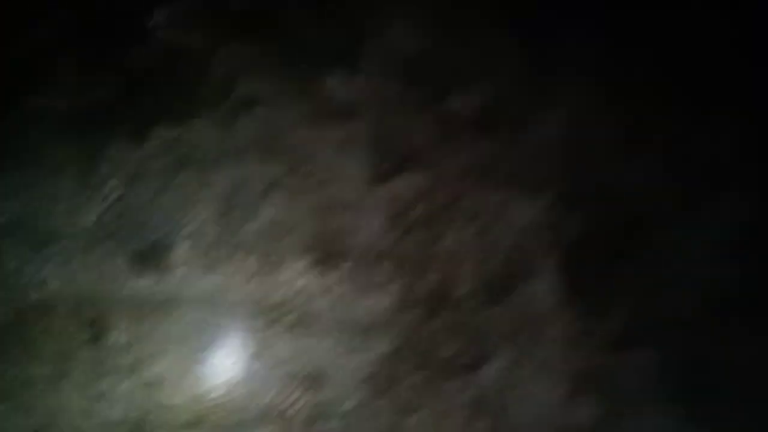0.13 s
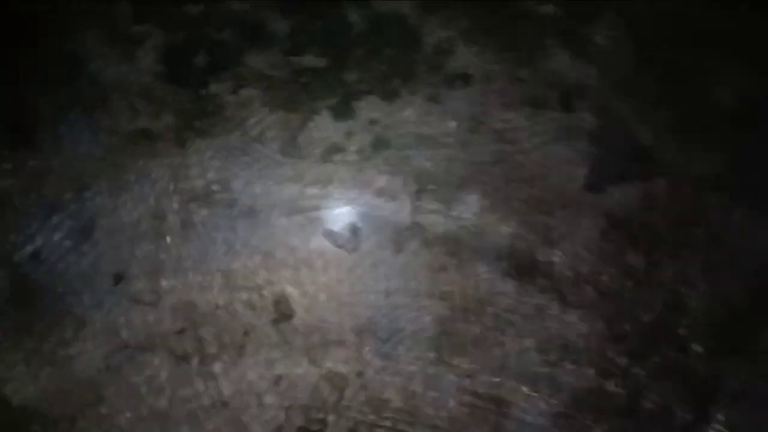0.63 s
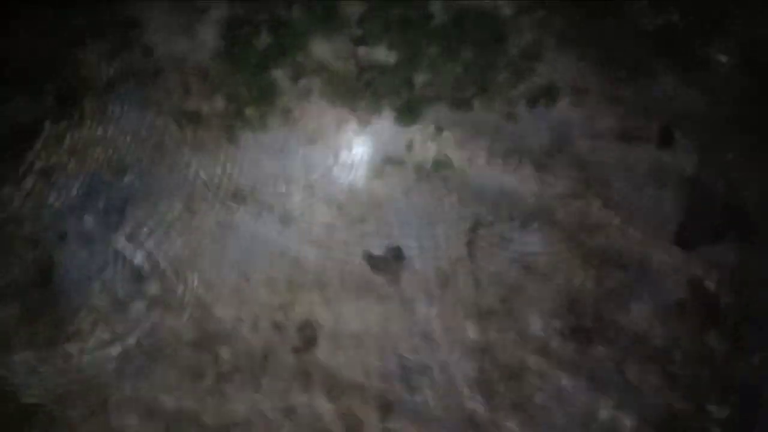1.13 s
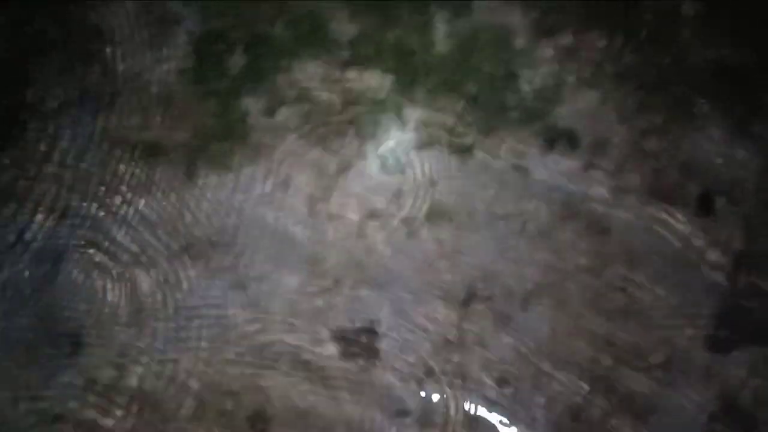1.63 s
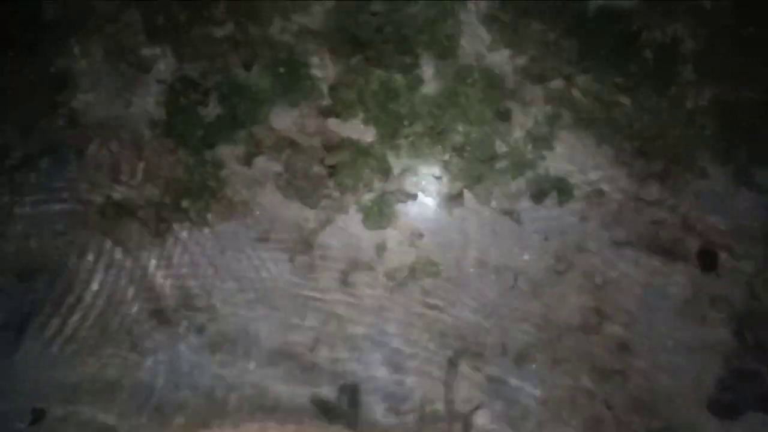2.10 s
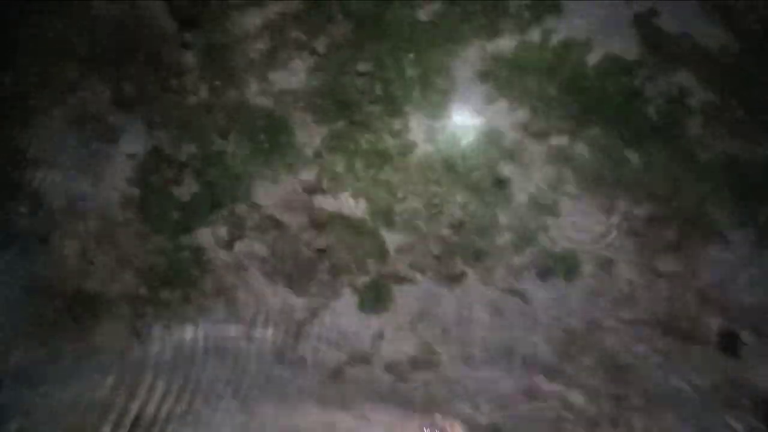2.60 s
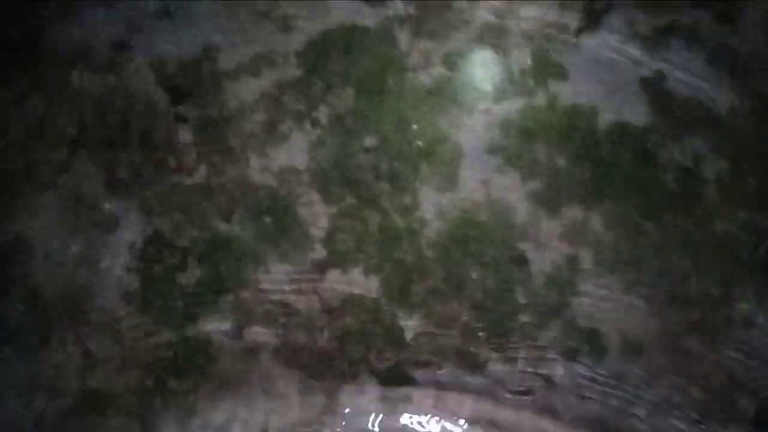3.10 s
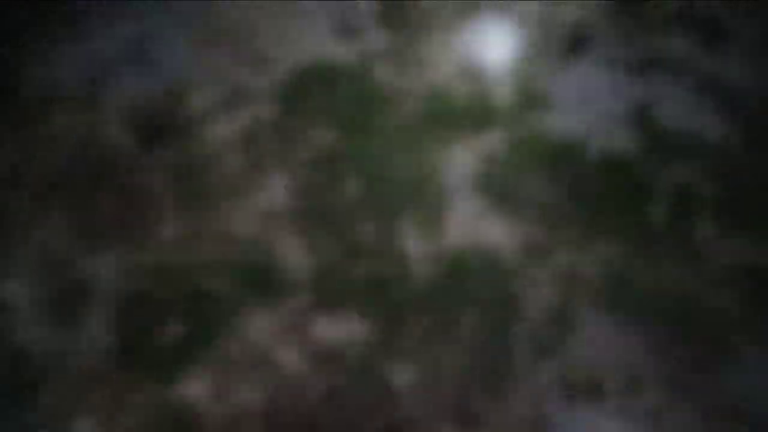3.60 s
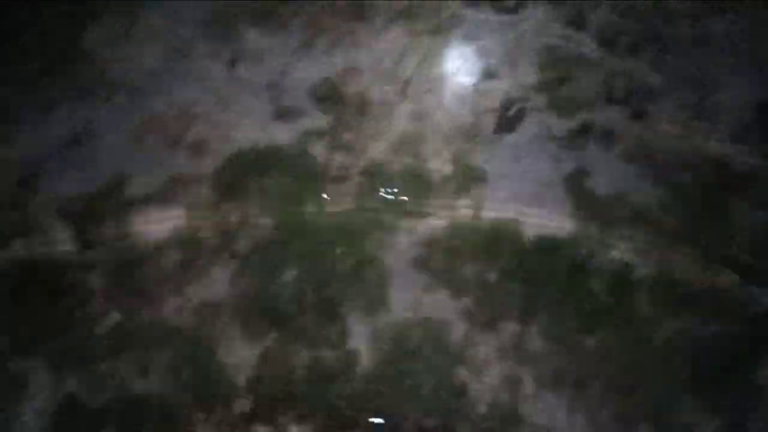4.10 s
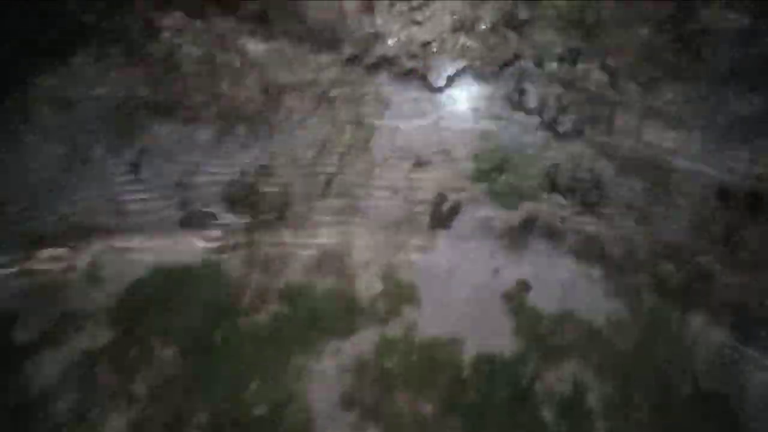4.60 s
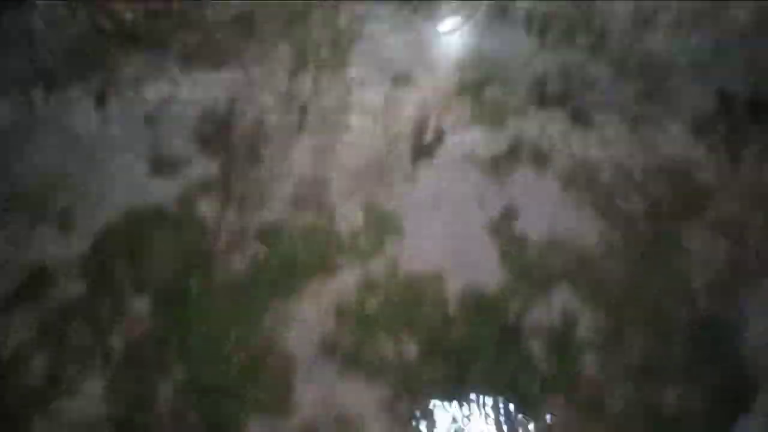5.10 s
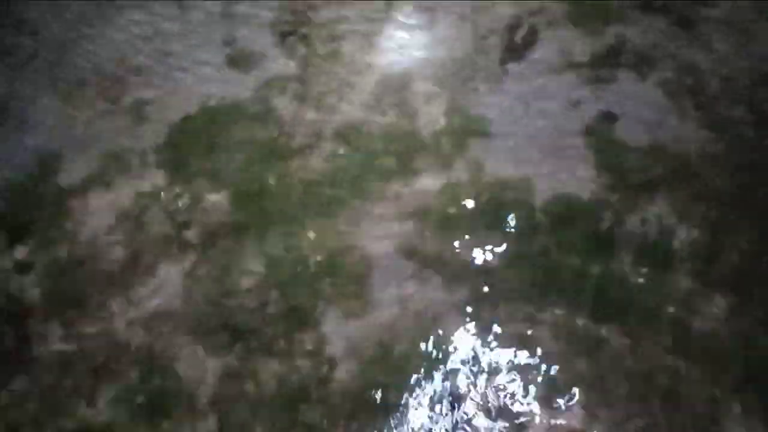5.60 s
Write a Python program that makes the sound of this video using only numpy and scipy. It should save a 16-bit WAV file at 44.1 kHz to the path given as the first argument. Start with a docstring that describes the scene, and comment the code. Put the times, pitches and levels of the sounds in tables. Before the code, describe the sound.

Outdoors on a quiet shore, water gurgles and blips in irregular bursts as someone wades. Sharp housing clicks and low grip thumps sit hard left in the first three seconds, sometimes covering the water. A dense run of ringing bubbles and light droplets peaks past two seconds; a shorter plopping burst follows near 3.8. The end is sparse, with little high pips and one late plop.

```python
"""Wading in shallow seawater

Someone wades by night, holding a small camera with two microphone ports; the far sea washes beneath.
Trapped bubbles are dying sine tones, many with rising pitch; spray, foam and wash are shaped noise.
Drips are short quiet pips near 2450 Hz, stronger on the left, whose port peaks near 2.5 kHz.
Creaks, bumps and rubbing of the grip are pulses, low tones and noise, far stronger on the left."""
import sys
import numpy as np
from scipy import signal
from scipy.io import wavfile
from scipy.ndimage import uniform_filter1d

SR = 44100
rng = np.random.default_rng(int(sys.argv[2]) if len(sys.argv) > 2 else 0)


def linear_from_db(decibels):
    """Turn decibels (scalar or array-like) into linear amplitude factors; 0 gives 1."""
    return 10 ** (np.asarray(decibels, float) / 20)


def materialize(psi):
    """Save the field psi as 16-bit PCM at rate SR to the path in sys.argv[1].

    A 1-D psi becomes a single channel; in a 2-D psi each row is a channel.
    """
    bounded = np.clip(np.atleast_2d(psi).T, -1, 1)
    quanta = np.round(bounded * 32767).astype(np.int16)
    wavfile.write(sys.argv[1], SR, quanta)


N = 251811  # length in samples

# far sea, relative strength across pitch: pitch_hz, level_db (per Hz)
SEA_SPECTRUM = [(15, -14.5), (25, 0), (36, -34.5), (55, -21.5), (353, -12), (590, -13.5), (774, -14),
                (1360, -24), (2470, -16.5), (3510, -42), (6540, -43), (13600, -45), (16000, -51)]
# how alike the far sea is at the two ports: pitch_hz, likeness (-1 to 1)
SEA_LIKENESS = [(60, 1), (180, 0.81), (550, 0.64), (1650, -1.05), (4970, -0.16), (15000, 0.081)]
# balance of the far sea: pitch_hz, left_over_right_db
SEA_BALANCE = [(60, 22), (110, 1), (200, -1.5), (380, -1), (700, 1.5), (1290, -1.5), (2380, 4.5),
               (4400, -7), (8120, 0), (15000, -2.5)]
SEA_LEVEL_DB = -58

# water stirred by the legs: start_s, gurgle_db, spray_db, fizz_db
STIRRING = [(0, -58, -84, -76), (.3, -58.5, -81, -79), (.45, -42.5, -83, -68), (.55, -67, -82, -67),
            (.68, -57, -85, -64), (.95, -80, -87, -69), (1.2, -49, -72, -61.5), (1.45, -53.5, -81, -81),
            (1.55, -60.5, -82, -67), (1.65, -55.5, -83.5, -64), (1.92, -63, -74.5, -67),
            (2.05, -49.5, -65.5, -65), (2.2, -47.5, -68, -55.5), (2.4, -43.5, -76.5, -58.5),
            (2.62, -54.5, -81, -69), (2.7, -61, -80, -52), (2.82, -62.5, -77, -67), (3.1, -58, -78, -62),
            (3.25, -64.5, -80, -72), (3.52, -55, -80.5, -83), (3.6, -57.5, -82, -82),
            (3.75, -54.5, -80, -66), (3.9, -48.5, -86, -67), (4.0, -61.5, -85, -91), (4.7, -61, -84, -79),
            (5.4, -59, -84, -78), (5.71, -61.5, -87, -87)]
# colour of near water at each port: pitch_hz, left_db, right_db
PORT_COLOUR = [(250, -21, -20.5), (740, -11.5, -16.5), (1500, -11, -17.5), (1800, -3.5, -12.5),
               (2620, 3.5, -11), (3496, -18.5, -20.5), (5270, -28, -29), (8700, -42.5, -37.5),
               (11770, -29, -44), (12600, -61.5, -41), (14100, -31.5, -31.5), (16000, -50.5, -73)]
# sharp ticks of spray: start_s, peak_db (rough level), left_over_right_db (before the port colour)
SPRAY_TICKS = [(0.3926, -57, 13), (0.6496, -52.5, -19), (1.0175, -46, -15.5), (1.1049, -46, 7),
               (1.267, -51.5, 4), (1.7576, -51.5, 2), (1.9991, -45.5, -2), (2.058, -59, -5),
               (2.0774, -65, -6), (2.1237, -45, 3), (2.152, -42.5, -2), (2.1886, -50, 19),
               (2.339, -38.5, 5), (2.6637, -51.5, 5), (2.7244, -49, 19), (3.1362, -48.5, 1),
               (3.3295, -53, -10), (3.6626, -54, -13), (5.6312, -42, 9.5)]
TREBLE_LOSS_DB = 40  # what the ports take from treble; spray and tick levels are those heard behind them

# creaks of the housing by the left port: time_s, level_db, ringing_share (0 to 1)
HOUSING_CREAKS = [(0.088, -15, 0.32), (0.104, -23.5, 0.53), (0.3951, -24, 0.8), (0.3988, -24, 0.85),
                  (0.471, -11, 0.78), (1.0911, -25, 0.1), (1.1058, -16.5, 0.4), (1.108, -29, 0.2),
                  (1.1171, -17, 0.43), (1.118, -10.5, 0.63), (1.1211, -7, 0.33), (1.1342, -21, 0.4),
                  (1.1351, -13.5, 0.8), (1.1514, -21.5, 0.54), (1.392, -25, 0.34), (1.4177, -27, 0.73),
                  (1.4742, -27.5, 0.26), (1.5033, -25.5, 0.3), (1.8439, -23.5, 0.9), (1.8604, -7.5, 0.68),
                  (1.8688, -15, 0.28), (1.8735, -21, 0.9), (1.8834, -15, 0.34), (1.8862, -5.5, 0.19),
                  (1.9036, -19, 0.48), (2.545, -24.5, 0.52), (2.664, -29.5, 0), (2.6768, -23.5, 1),
                  (2.7104, -16.5, 0.49), (2.7197, -24, 0.56), (2.728, -14.5, 0.57), (2.7309, -19.5, 0.68)]
# dull bumps of the grip, left port: time_s, level_db, nominal_pitch_hz (the pitch glides down)
GRIP_BUMPS = [(0.188, -19.5, 98), (0.334, -43, 111), (.42, -33, 151), (0.691, -40, 89),
              (2.398, -35.5, 93.5), (2.551, -40.5, 101)]
# strokes of the hand along the housing: start_s, hold_s, level_db
HAND_STROKES = [(0.072, 0.4, -49.5), (0.151, 0.037, -41), (0.332, .01, -46.5), (0.401, 0.025, -36),
                (1.1, 0.0085, -34), (1.872, 0.013, -44), (2.7, 0.0091, -44.5)]
# colour of the rubbing: pitch_hz, level_db
RUBBING_COLOUR = [(30, -31.5), (150, -5), (400, -0.5), (1200, -6), (2400, -1), (3300, -14), (6000, -32.5),
                  (15000, -44.5)]
# low rumble of the moving hand, left port: time_s, level_db
HAND_RUMBLE = [(0, -57), (.4, -62), (.9, -57.5), (1.5, -62), (2.5, -71), (2.8, -70), (5.71, -86)]
RUB_RISE_DB_PER_S, RUB_FALL_DB_PER_S, RUB_REST_DB = 702, 320, -62

# bubbles that stand out, low and high:
# start_s, left_peak_db, start_pitch_hz, rise_per_cycle (log of pitch ratio), fall_60db_s
CLEAR_BUBBLES = [(.0991, -41, 470, 0.018, 0.031), (.278, -43, 1590, 0.0018, .015),
                 (.4249, -36, 980, 0.046, .0097), (.4435, -31, 1800, .013, .011),
                 (.448, -30, 2160, 0.057, 0.0061), (.4495, -39, 646, 0.0073, 0.034),
                 (0.4548, -40, 850, 0.021, .082), (0.4645, -27.5, 1330, 0.0066, .012),
                 (0.474, -26.5, 1350, .02, 0.011), (.4748, -36, 940, 0.0043, 0.03),
                 (.5221, -42, 755, 0.0046, 0.19), (.586, -40, 433, 0.031, 0.0093),
                 (.625, -46, 1080, 0.021, .03), (.64, -45.5, 427, 0.00031, 0.016),
                 (.655, -44.5, 686, .003, .04), (.678, -53, 920, 0.017, 0.075),
                 (.73, -50, 944, 0.017, 0.049), (.8353, -42.5, 1950, 0.00029, .028),
                 (0.989, -45, 880, 0, .099), (1.0153, -40.5, 1003, 0.0041, 0.09),
                 (1.0153, -28, 1980, 0, 0.0025), (1.03, -47.5, 763, 0, 0.16),
                 (1.1126, -24, 2360, 0.019, 0.019), (1.111, -24.5, 1630, 0.067, 0.014),
                 (1.1668, -45, 439, .011, 0.27), (1.1913, -36, 3900, 0, 0.0045),
                 (1.196, -38.5, 1033, 0.0078, 0.056), (1.2111, -38.5, 750, .0057, 0.056),
                 (1.215, -26.5, 2180, 0.0056, 0.0089), (1.2344, -40.5, 1200, .0042, 0.041),
                 (1.235, -46, 630, 0.0018, 0.12), (1.13, -47.5, 518, 0.017, 0.12),
                 (1.254, -31, 2180, .027, 0.015), (1.26, -20.5, 2460, 0, 0.0083),
                 (1.2649, -35.5, 670, 0, .056), (1.266, -32, 1920, .014, 0.021),
                 (1.2782, -46, 610, 0, 0.19), (1.306, -38.5, 800, 0.012, 0.054),
                 (1.3141, -35.5, 597, 0.0077, 0.15), (1.3287, -48, 615, 0.011, 0.14),
                 (1.2065, -43, 1100, .0025, 0.041), (1.315, -28.5, 1350, 0, 0.024),
                 (1.323, -29.5, 1520, 0.0047, 0.021), (1.3436, -40, 662, 0.036, .1),
                 (1.3861, -28.5, 1950, 0.017, 0.021), (1.4413, -23, 2460, .004, .012),
                 (1.4831, -32.5, 1450, 0.05, 0.06), (1.488, -42.5, 910, 0.0035, 0.063),
                 (1.4896, -27.5, 1980, .024, 0.021), (1.6302, -22.5, 2460, 0, 0.0054),
                 (1.6399, -37.5, 759, 0.0021, 0.094), (1.6622, -44, 750, 0.0082, 0.1),
                 (1.75, -42.5, 1440, 0.0045, .032), (1.851, -32, 2510, 0, .038),
                 (1.993, -42.5, 990, 0.0067, 0.18), (2.0109, -35.5, 1260, 0.032, 0.025),
                 (2.015, -36.5, 2260, 0, 0.021), (2.0553, -34.5, 1640, 0.011, 0.059),
                 (2.0922, -29, 2060, 0.00069, 0.0081), (2.0907, -36.5, 896, 0.013, 0.1),
                 (2.0946, -35, 525, 0.036, 0.041), (2.1061, -41, 535, 0, 0.093),
                 (2.108, -28, 1800, 0.0085, 0.029), (2.1134, -24, 2300, 0.01, 0.008),
                 (2.1154, -40, 718, 0.0016, 0.2), (2.1234, -26, 1660, 0.002, 0.02),
                 (2.1282, -30.5, 1410, 0.032, 0.038), (2.1316, -33, 1680, 0, .033),
                 (2.0449, -41.5, 2900, 0, 0.014), (2.134, -26.5, 2630, 0.01, 0.012),
                 (2.155, -46, 1110, .012, .022), (2.1762, -42.5, 866, .012, 0.076),
                 (2.1754, -29.5, 2820, 0.0049, 0.031), (2.1752, -18.5, 2100, 0, 0.0076),
                 (2.175, -28.5, 1600, 0.01, .04), (2.1818, -29, 2194, 0.0059, 0.065),
                 (2.186, -26, 1710, .0095, 0.036), (2.2104, -34.5, 787, .0012, 0.089),
                 (2.214, -30, 2700, .0088, .005), (2.221, -29, 1800, .013, 0.015),
                 (2.2226, -32, 3300, 0.024, .016), (2.2334, -40.5, 798, 0.033, 0.14),
                 (2.262, -35, 2700, 0.018, 0.0083), (2.2852, -44, 580, 0, 0.064),
                 (2.2862, -24.5, 3100, .022, 0.0023), (2.2871, -24.5, 2145, .0059, 0.034),
                 (2.2874, -24, 1800, 0, 0.025), (2.2936, -23, 1800, 0.05, .015),
                 (2.3361, -35.5, 585, 0.086, 0.056), (2.3364, -15.5, 2610, 0.0018, .0072),
                 (2.342, -18.5, 2180, 0.044, 0.0096), (2.3447, -38.5, 675, .011, 0.12),
                 (2.3456, -31.5, 1800, 0, .027), (2.358, -29, 2530, 0.0072, 0.01),
                 (2.3725, -43, 408, 0.064, 0.05), (2.405, -50, 814, .012, .05),
                 (2.4482, -32, 1800, 0.032, 0.026), (2.3873, -45, 523, .012, 0.068),
                 (2.449, -28.5, 3320, .025, 0.0063), (2.4511, -26, 2120, 0.06, .0204),
                 (2.505, -27, 3600, .0069, .0083), (2.5398, -45.5, 1000, 0.013, 0.15),
                 (2.5686, -24.5, 2440, 0, .0058), (2.583, -36.5, 832, 0.045, 0.026),
                 (2.591, -40, 1000, 0.005, 0.053), (2.611, -37, 2300, 0.018, 0.018),
                 (2.812, -52.5, 960, 0.014, 0.11), (3.088, -54, 695, 0.000098, 0.095),
                 (3.084, -47.5, 1050, .041, 0.051), (3.139, -40.5, 1440, .006, 0.032),
                 (3.169, -41, 1630, 0.0088, 0.052), (3.329, -19.5, 2300, 0.12, 0.002),
                 (3.5101, -30.5, 2206, 0.012, 0.029), (3.516, -42, 1490, 0.0035, 0.04),
                 (3.64, -50, 533, .0026, 0.1), (3.643, -45.5, 3980, 0, 0.0066),
                 (3.6476, -23.5, 2330, 0, 0.0053), (3.6502, -26, 1756, 0.028, .058),
                 (3.7348, -24.5, 2420, 0.0039, .014), (3.7563, -46.5, 695, 0.00058, 0.18),
                 (3.7568, -34.5, 855, .026, 0.075), (3.7655, -12, 2216, 0.02, 0.023),
                 (3.803, -41, 4300, .0016, 0.0048), (3.8059, -39.5, 698, 0.013, 0.12),
                 (3.771, -31.5, 3520, 0, 0.0051), (3.8079, -14.5, 2160, 0, 0.013),
                 (3.816, -37, 1960, 0, .02), (3.8213, -23, 2800, 0, .0065),
                 (3.8406, -26, 2540, 0.0052, 0.014), (3.8857, -37.5, 1024, 0.0024, 0.067),
                 (3.886, -34.5, 1400, 0.027, 0.042), (3.8886, -25, 2070, .01, 0.0028),
                 (3.905, -48.5, 746, 0, .06), (3.934, -34, 2130, 0.0016, 0.032),
                 (3.9464, -29.5, 1980, 0.026, 0.021), (3.9777, -36.5, 2700, 0, .027),
                 (4.027, -39.5, 1780, 0.0065, 0.037), (5.4272, -31, 1670, 0.022, 0.0089),
                 (5.428, -22, 2620, 0, .0024), (5.6335, -46, 4070, 0, 0.0077),
                 (5.6316, -24, 2410, 0.012, 0.0049)]
# the left port favours bubbles near its peak: pitch_hz, left_over_right_db (before a small random extra)
BUBBLE_BALANCE = [(500, -2.5), (900, 0), (1350, 4), (1750, 6.5), (2200, 14.5), (2600, 12), (3600, 17),
                  (3950, -10.5)]
WOBBLE_DB, WOBBLE_S = 1.5, 0.0065  # the heaving surface makes each bubble's ring uneven
SPLASH_LAG, DRIP_LAG = 4, 20  # samples by which sound reaches the left port late

# drips, short quiet pips near 2450 Hz, stronger on the left: start_s, left_peak_db
DRIP_PIPS = [(.7227, -34), (.878, -42), (1.1731, -26), (1.324, -28.5), (2.8697, -34.5), (3.0323, -31.5),
             (3.0852, -30), (3.158, -30.5), (3.3106, -35), (3.3751, -32), (3.4773, -32), (3.5377, -28.5),
             (3.6837, -37), (3.724, -30.5), (3.9952, -36), (4.0159, -31.5), (4.2087, -37), (4.3401, -32),
             (4.3866, -30), (4.6644, -36.5), (4.647, -38.5), (4.6763, -37), (4.7237, -38), (4.734, -34.5),
             (4.9477, -37), (5.0278, -36), (5.1946, -32.5), (5.234, -30), (5.396, -35.5), (5.4504, -33),
             (5.5023, -33.5), (5.5149, -35), (5.694, -40)]

# soft hiss of foam after a splash: start_s, length_s, level_db, pitch_hz, width_hz
FOAM_HISSES = [(1.123, 0.1, -66, 4200, 2000), (2.662, 0.055, -57.5, 4130, 2000),
               (2.75, .11, -68, 4280, 2000)]
FOAM_EDGE_S, FOAM_LEFT_OVER_RIGHT_DB = 0.034, 14

CONVERTER_EDGE_HZ, CONVERTER_OFFSET = 15800, 0.001


def evened(x):
    """Scales a sound to an average (rms) strength of 1."""
    return x / np.sqrt(np.mean(x ** 2) + 1e-20)


def slow_noise(samples):
    """Noise smoothed over this many samples, so that it wanders slowly; rms 1."""
    return evened(uniform_filter1d(rng.standard_normal(N), samples))


def read(points, hz, column=1):
    """Reads a table across pitch, on a log-frequency axis."""
    table = np.transpose(points)
    return np.interp(np.log(hz + 1), np.log(table[0] + 1), table[column])


def curve(rows, column=1):
    """Reads a table across time, giving a value for every sample."""
    table = np.transpose(rows)
    return np.interp(np.arange(N) / SR, table[0], table[column])


def add(mix, start_s, sound):
    """Mixes a sound in at its start time, cutting what runs past the end."""
    part = mix[..., round(start_s * SR):][..., :sound.shape[-1]]
    part += sound[..., :part.shape[-1]]


def colour(sound, points, column=1):
    """Filters a sound by a pitch table, with no sound ahead of its cause (minimum phase)."""
    db = read(points, np.fft.rfftfreq(4096, 1 / SR), column)
    log_gain = np.log(linear_from_db(np.concatenate([db, db[-2:0:-1]])))
    response = np.fft.ifft(np.exp(np.conj(signal.hilbert(log_gain)))).real[:1024]
    return signal.oaconvolve(sound, response)[:N]


def clicks(per_s, spread_db):
    """Sparse random clicks, a few of them large."""
    size = linear_from_db(spread_db * np.minimum(rng.exponential(1, N), 4))
    return size * (rng.random(N) < per_s / SR)


def ports(left, right):
    """Colours near sound as each port hears it."""
    return np.array([colour(left, PORT_COLOUR, 1), colour(right, PORT_COLOUR, 2)])


def ring(hz, rise, t60, phase):
    """One bubble, peak about 1: a dying sine whose pitch may climb until it bursts at the surface."""
    t = np.arange(int(t60 * SR) + 2) / SR
    climb = np.minimum(rise * hz * t, 1)  # log of the pitch ratio
    pitch = hz * np.exp(climb)
    burst_db = 150 * climb ** 4
    # the housing dulls what climbs past its peak
    muffle_db = 28.0 * np.log(np.maximum(pitch, 2800) / max(hz, 2800))
    onset = 1 - np.exp(-(t * hz / 1.47) ** 2)
    swell = onset * linear_from_db(-60 * t / t60 - burst_db - muffle_db)
    return swell / swell.max() * np.sin(2 * np.pi * (np.cumsum(pitch) / SR + phase))


def sea():
    """Far wash: random short-time spectra with faint patches that come and go."""
    frames, hz = N // 256 + 5, np.fft.rfftfreq(1024, 1 / SR)
    a, b, c, d, patches = rng.standard_normal((frames, 513, 5)).T
    patches = uniform_filter1d(patches, 12, 0)  # smooth across pitch
    patches = evened(uniform_filter1d(patches, 14, 1))  # smooth across time
    same = np.clip(read(SEA_LIKENESS, hz), -1, 1)[:, None]
    left = a + 1j * b
    right = same * left + np.sqrt(1 - same ** 2) * (c + 1j * d)
    right /= linear_from_db(read(SEA_BALANCE, hz))[:, None]
    spectra = np.array([left, right]) * linear_from_db(read(SEA_SPECTRUM, hz)[:, None] + patches)
    wash = signal.istft(spectra, nperseg=1024, noverlap=768)[1][:, :N]
    return linear_from_db(SEA_LEVEL_DB) * evened(wash)


def swarm(pitches_hz, per_s, spread_db, cycles, tilt):
    """Random bubbles of many pitches, each pitch from its own direction, heard through the ports."""
    left, right = np.zeros((2, N))
    for hz, (length, rise, lag, side) in zip(pitches_hz, rng.random((len(pitches_hz), 4))):
        grain = ring(hz, 0.033 * rise, cycles * (0.44 + length ** 2) / hz, lag)
        grain = grain / np.linalg.norm(grain) * (hz / 2000) ** tilt
        train = signal.oaconvolve(clicks(per_s, spread_db), grain)[:N]
        left += np.roll(train, int(3 * SPLASH_LAG * lag)) * linear_from_db(1.2 * (side - 0.5))
        right += train / linear_from_db(14 * (side - 0.5))
    return evened(ports(left, right))


def churn():
    """Stirred water: a dense gurgle of many bubbles over a surging wash, and a fine fizz of higher ones."""
    surge = linear_from_db(4.5 * slow_noise(600))
    shared, left, right = rng.standard_normal((3, N)) * surge
    wash = evened(ports(shared + 1.45 * left, shared + 0.42 * right))
    laps = linear_from_db(3.94 * slow_noise(2600))  # bubbles come in clusters
    crowd = swarm(np.geomspace(450, 3600, 28), per_s=30, spread_db=2.83, cycles=49.0, tilt=0.27)
    gurgle = laps * crowd + 0.46 * wash
    fizz = swarm(np.geomspace(3000, 6500, 14), per_s=70, spread_db=6.4, cycles=65.0, tilt=0.17)
    return linear_from_db(curve(STIRRING)) * gurgle + linear_from_db(curve(STIRRING, 3)) * fizz


def spray():
    """Droplets crackle in clumps as they land, as short noise bursts; the sharpest are single ticks."""
    showers = linear_from_db(4 * slow_noise(400))
    fade = linear_from_db(-60 * np.arange(400) / 770.0)
    landings = signal.oaconvolve(clicks(500, 4.6) * showers, fade)[:N]
    shared, left, right = rng.standard_normal((3, N)) * landings
    crackle = evened(np.array([shared + 2.9 * left, shared + 1.9 * right]))
    drops = linear_from_db(curve(STIRRING, 2) + TREBLE_LOSS_DB) * crackle
    tick_fade_db = -60 * np.arange(260) / 190.0
    bursts = rng.standard_normal((len(SPRAY_TICKS), 2, 260))
    for (start_s, db, left_db), burst in zip(SPRAY_TICKS, bursts):
        balance_db = np.array([[0.5], [-0.5]]) * left_db
        add(drops, start_s, linear_from_db(db + TREBLE_LOSS_DB + balance_db + tick_fade_db) * burst)
    # the splash itself is carried by the bubbles
    treble = signal.butter(3, 4200, "high", fs=SR, output="sos")
    return ports(*signal.sosfilt(treble, drops))


def creaks():
    """Each slip of the housing gives a pressure push, a short ringing of the port and a sharp snap."""
    out, t = np.zeros(N), np.arange(-40, 400) / SR
    push = -np.exp(-(t / 0.00012) ** 2)
    push += 0.5 * np.exp(-((t - 0.0006) / 0.00038) ** 2)
    push -= 0.014 * np.exp(-((t - 0.002) / 0.002) ** 2)
    ring_shape = np.exp(-(t / np.where(t < 0, 0.00022, 0.0004)) ** 2)
    ringing = -np.cos(2 * np.pi * 2500 * t) * ring_shape
    snap = -0.07 * np.exp(-(t / 0.00005) ** 2)
    for time_s, db, share in HOUSING_CREAKS:
        add(out, time_s + t[0], linear_from_db(db) * ((1 - share) * push + share * ringing + snap))
    return out


def bumps():
    """Dull knocks: a low, fast-dying tone that glides down in pitch."""
    out = np.zeros(N)
    for time_s, db, hz in GRIP_BUMPS:
        turns = np.arange(int(3 * SR / hz)) * hz / SR
        add(out, time_s - 0.002, linear_from_db(db - 25.0 * turns) * np.sin(2 * np.pi * turns ** 0.81))
    return out


def strokes():
    """Level in dB of the rubbing hand: each stroke rises, holds and falls back to rest."""
    t, each = np.arange(N) / SR, []
    for start_s, hold_s, db in HAND_STROKES:
        before = np.maximum(start_s - t, 0)
        after = np.maximum(t - start_s - hold_s, 0)
        each.append(db - RUB_RISE_DB_PER_S * before - RUB_FALL_DB_PER_S * after)
    return np.maximum(np.max(each, axis=0), RUB_REST_DB)


def rubbing():
    """The hand slips on the housing: random clicks and steady noise, coloured and led by the strokes."""
    slips = clicks(900, 5.0) * rng.standard_normal(N) + 0.63 * rng.standard_normal(N)
    return linear_from_db(strokes()) * evened(colour(slips, RUBBING_COLOUR))


def rumble():
    """Low rumble of the moving hand: lumpy noise kept to the bass."""
    lumps = rng.standard_normal(N) * linear_from_db(5 * slow_noise(2500))
    bass = signal.butter(2, [45, 130], "band", fs=SR, output="sos")
    return linear_from_db(curve(HAND_RUMBLE)) * evened(signal.sosfilt(bass, lumps))


def grip():
    """All handling sounds reach the left port through the housing, and the right one 32 dB weaker."""
    handling = rumble() + rubbing() + creaks() + bumps()
    # the deep bass of the handling sounds is cut away
    no_deep_bass = signal.butter(2, 55, "high", fs=SR, output="sos")
    return signal.sosfilt(no_deep_bass, handling) * linear_from_db(np.array([[0], [-32.0]]))


def bubbles():
    """Bubbles that stand out, low and high, each a ringing tone; they reach the right port first."""
    out = np.zeros((2, N))
    window = np.hanning(int(WOBBLE_S * SR) + 3)
    heave = evened(signal.oaconvolve(rng.standard_normal(N), window, "same"))
    wobble = linear_from_db(WOBBLE_DB * heave)
    draws = rng.random((len(CLEAR_BUBBLES), 3))
    for (start_s, db, hz, rise, t60), (phase, side, place) in zip(CLEAR_BUBBLES, draws):
        sound = linear_from_db(db) * ring(hz, rise, t60, phase)
        sound = sound * wobble[int(place * (N - len(sound))):][:len(sound)]
        left_db = read(BUBBLE_BALANCE, hz) + 1.7 * (side + 0.5)
        add(out[0], start_s, sound)
        add(out[1], start_s - SPLASH_LAG / SR, sound / linear_from_db(left_db))
    return out


def drips():
    """Short quiet pips near 2450 Hz: a dying sine of steady pitch, with a fainter copy on the right."""
    out = np.zeros((2, N))
    draws = rng.random((len(DRIP_PIPS), 3))
    for (start_s, db), (tune, phase, side) in zip(DRIP_PIPS, draws):
        sound = linear_from_db(db) * ring(2450 * (1 + 0.034 * (tune - 0.5)), 0, 0.0048, phase)
        add(out[0], start_s, sound)
        add(out[1], start_s - DRIP_LAG / SR, sound / linear_from_db(15.5 + 7.6 * side))
    return out


def foam():
    """Countless tiny bubbles burst together: smooth narrow noise that swells and fades."""
    out, noise = np.zeros((2, N)), rng.standard_normal((2, N))
    balance_db = FOAM_LEFT_OVER_RIGHT_DB * np.array([[0.5], [-0.5]])
    for start_s, length_s, db, hz, width_hz in FOAM_HISSES:
        t = np.arange(0, length_s, 1 / SR)
        band = signal.butter(2, [hz - width_hz / 2, hz + width_hz / 2], "band", fs=SR, output="sos")
        hiss = evened(signal.sosfilt(band, noise[:, round(start_s * SR):][:, :len(t)]))
        swell = np.minimum(np.minimum(t, length_s - t) / FOAM_EDGE_S, 1)
        add(out, start_s, linear_from_db(db + balance_db) * swell * hiss)
    return out


def scene():
    """Far sea, stirred water and the hand on the camera."""
    return sea() + churn() + spray() + grip() + bubbles() + drips() + foam()


def roll_off(x):
    """The treble ends steeply here."""
    return signal.sosfilt(signal.butter(12, 16110, fs=SR, output="sos"), x)


def record(dry):
    """The converter cuts the highest treble and adds a small constant offset."""
    low_pass = signal.firwin(255, CONVERTER_EDGE_HZ, fs=SR)
    limited = signal.oaconvolve(dry, low_pass[None], "same")
    finished = limited + CONVERTER_OFFSET
    return roll_off(finished)


dry = scene()
out = record(dry)
materialize(out)
```